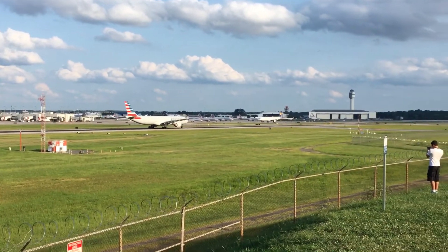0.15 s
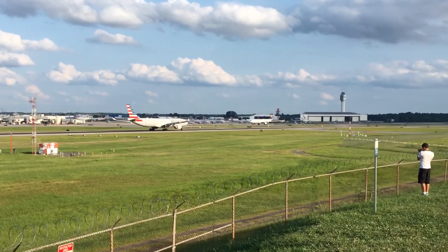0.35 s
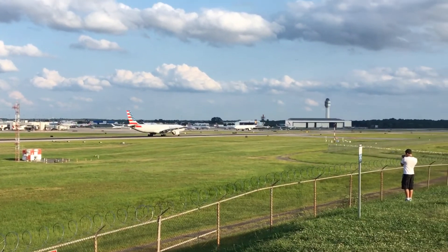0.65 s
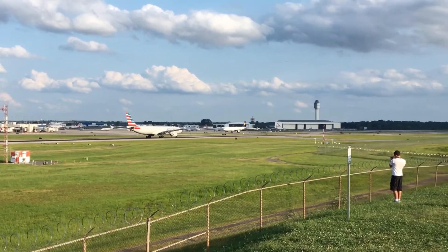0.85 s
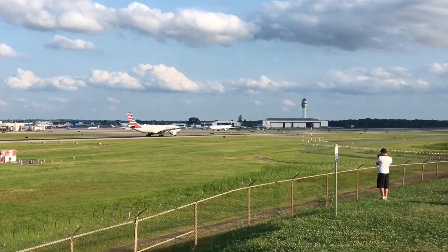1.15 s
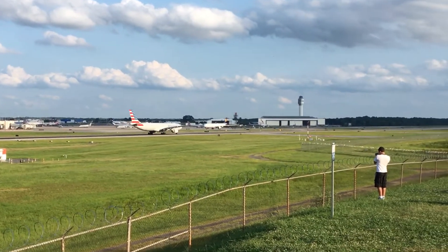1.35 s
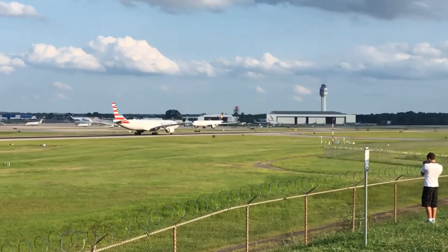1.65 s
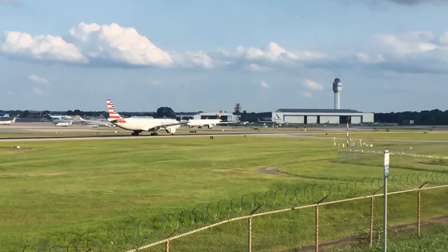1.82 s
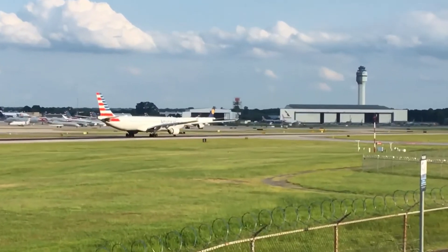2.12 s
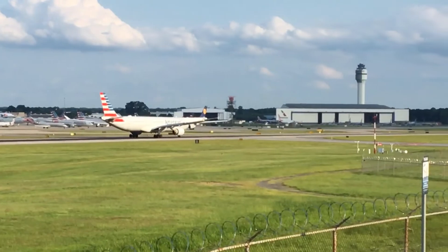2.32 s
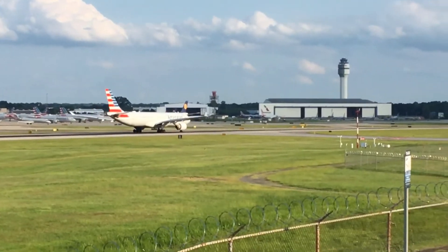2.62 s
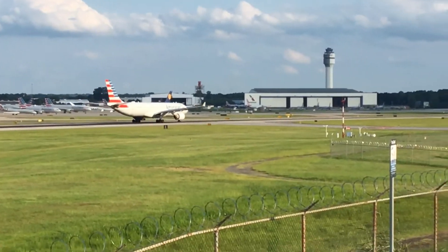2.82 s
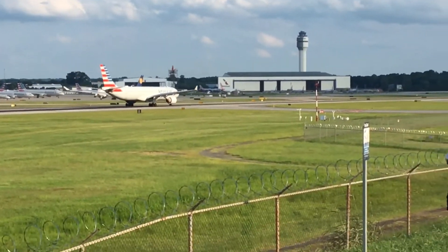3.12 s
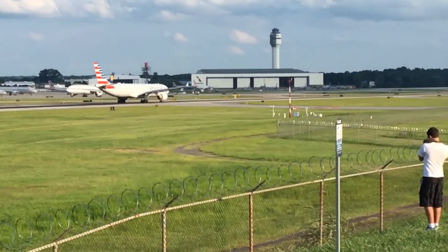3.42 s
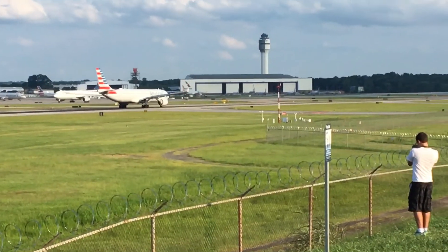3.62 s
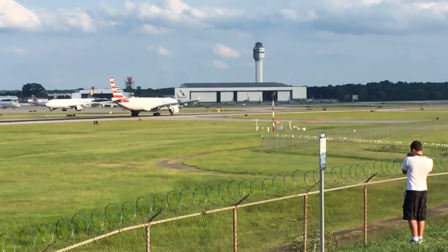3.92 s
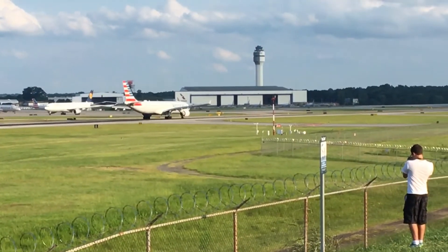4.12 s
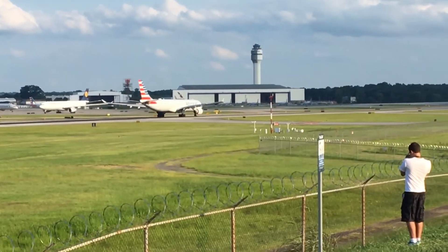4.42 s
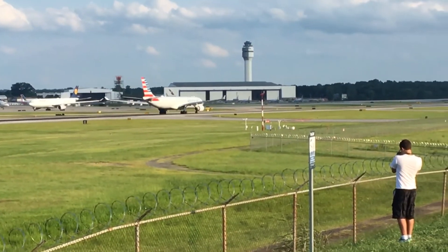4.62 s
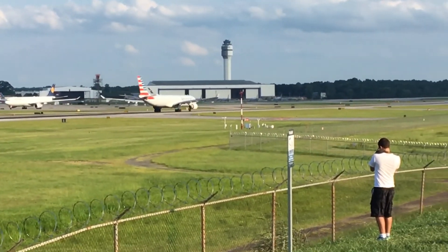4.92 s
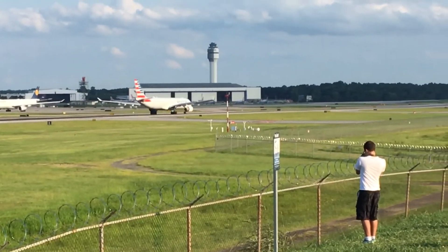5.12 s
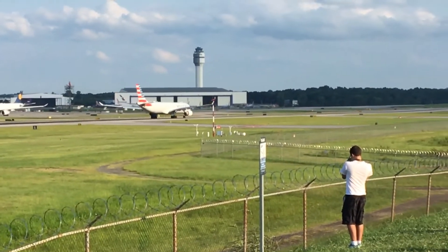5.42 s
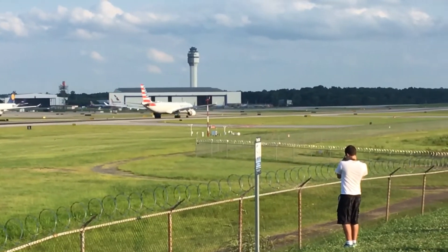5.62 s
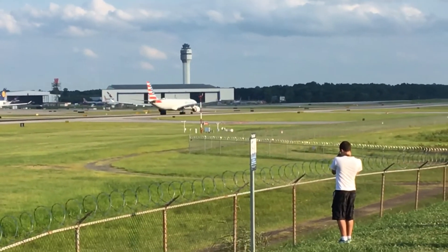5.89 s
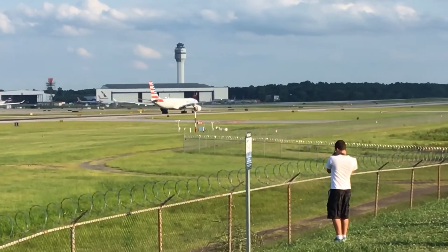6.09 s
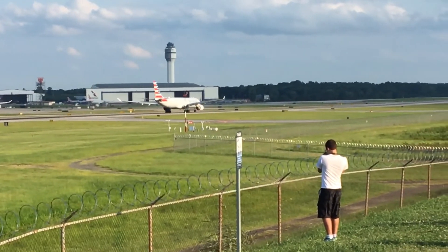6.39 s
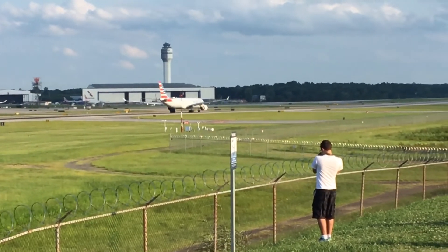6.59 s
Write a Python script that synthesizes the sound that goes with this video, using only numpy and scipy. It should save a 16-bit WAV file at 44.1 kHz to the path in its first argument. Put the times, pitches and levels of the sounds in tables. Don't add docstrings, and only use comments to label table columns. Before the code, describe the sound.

One outdoor microphone low in grass picks up a distant departing jet: heavy, lumpy bass rumble dominates, under a softer mid-range roar that swells and fades. Tiny, very high insect ticks give way to a fast thin buzz after two seconds. Low wind wash runs throughout, with soft thumping puffs from about three seconds and stronger ones near the end. There is only a trace of hiss.

```python
import sys
import numpy as np
from scipy import signal
from scipy.io import wavfile
from scipy.ndimage import uniform_filter1d, minimum_filter1d

SR = 44100
rng = np.random.default_rng(int(sys.argv[2]) if len(sys.argv) > 2 else 0)


def pcm_store(signal):
    levels = np.round(np.clip(np.atleast_2d(signal), -1, 1) * 32767)
    wavfile.write(sys.argv[1], SR, levels.astype(np.int16).T)


def nominal_scale(level):
    x = np.asarray(level, float) / 20
    return 10 ** x


N = 297675


def evened(x):
    return x / np.sqrt(np.mean(x ** 2) + 1e-20)


def read(points, hz):
    f, value = np.transpose(points)
    return np.interp(np.log(hz + 1), np.log(f + 1), value, -120, -120)


def columns(rows, t):
    s, *values = np.transpose(rows)
    return [np.interp(t, s, v) for v in values]


def humps(rows, t):
    return sum(db * np.exp(-2 * (2 * (t - s) / length) ** 2) for s, db, length in rows)


def bell(hz, centre_hz, width_hz):
    return np.exp(-2 * ((hz - centre_hz) / width_hz) ** 2)


def frame_grid(size):
    t = np.arange(4 * N // size + 5)[:, None] * size / 4 / SR
    return t, np.fft.rfftfreq(size, 1 / SR)[None]


def noise(field_db, size):
    z = rng.standard_normal(field_db.shape) + 1j * rng.standard_normal(field_db.shape)
    x = signal.istft((z * nominal_scale(field_db)).T, nperseg=size, noverlap=3 * size // 4)[1]
    return evened(x[:N])


def patches(shape, frames, bins):
    along_time = uniform_filter1d(rng.standard_normal(shape), frames, 0)
    return evened(uniform_filter1d(along_time, bins, 1))


def steadied(x, share, size):
    power = uniform_filter1d(uniform_filter1d(x ** 2, size), size)
    return evened(x / (power + 0.023) ** (np.clip(share, 0, 1) / 2))


def rumble():
    # f/Hz, level/dB per Hz
    colour = [(14, -65.5), (22, -34), (30, -10), (38, -16.5), (48, -1), (68, -1.5), (78, -1.5), (90, -7),
              (105, -7.5), (120, -18), (135, -23.5), (150, -34.5), (200, -67)]
    # t/s, stretch of the hump's upper flank [ratio]
    receding = [(0, 1), (1.5, 0.91), (3.3, 0.84), (5.0, 0.87), (6.75, 0.38)]
    # t/s, level/dB over steady, length/s
    eddies = [(0.429, -3.6, 0.14), (0.708, -5, 0.07), (1.512, 2, 0.14), (1.686, -8.5, 0.11),
              (1.771, 1.5, 0.055), (1.886, -3.5, 0.083), (1.99, -4.3, 0.07), (2.1, 1.5, 0.12),
              (2.2, -5.5, 0.097), (2.355, 2, 0.2), (2.484, -6, 0.05), (2.614, -3.5, 0.19),
              (2.883, -5.5, 0.11), (2.953, 10, 0.04), (3.123, -15, 0.04), (3.542, -4, 0.058),
              (4.225, -11, 0.076), (4.515, -2.5, 0.05), (4.779, -6, 0.062), (4.879, -9, 0.05),
              (5.173, 6.1, 0.091), (5.278, -6.5, 0.12), (5.418, 7.5, 0.017), (5.672, -5.2, 0.044),
              (5.887, 8, 0.032), (5.981, 6.5, 0.033), (6.146, -6.5, 0.11), (6.321, 7, 0.038),
              (6.54, 5, 0.071), (6.63, -10, 0.12)]
    level_db, flank_from_hz = -12, 80
    t, hz = frame_grid(size=4096)
    flank = np.maximum(hz - flank_from_hz, 0)
    stretched_hz = hz - flank + flank / columns(receding, t)[0]
    x = noise(read(colour, stretched_hz), size=4096)
    crest = np.argmax(x[:SR // 2])
    x = np.pad(x[crest:], (0, crest), "reflect")
    swell_db = 1.12 * humps(eddies, np.arange(N) / SR)
    return nominal_scale(level_db + swell_db) * steadied(x, 0.6, size=2000)


def roar():
    # f/Hz, level/dB per Hz
    jet_colour = [(380, -32), (640, 1.5), (780, -1.26), (1110, -13.5), (1750, -13), (2400, -15.5),
                  (2700, -22.5), (3700, -27), (4300, -29), (5500, -31.0), (6700, -35.5), (7700, -44.5),
                  (9000, -55), (10300, -67), (11500, -91.5)]
    # f/Hz, width/Hz, level/dB
    ground = [(666, 540, 1.0), (1744, 250, 3), (2620, 130, -5), (2970, 130, -4.5), (3386, 390, 4),
              (4610, 210, -4)]
    bands_hz = [750, 1800, 3500, 6300]
    # t/s, level/dB
    air_rows = [(0.0, -28), (0.21, -29.5), (0.9, -23.5), (1.49, -28), (2.27, -26), (2.29, -25), (2.44, -29),
                (2.95, -26.5), (3.01, -28), (3.35, -22.5), (3.99, -29), (4.04, -33.5), (4.74, -29.5),
                (4.91, -24.5), (5.83, -24.5), (6.07, -31), (6.13, -28), (6.75, -26)]
    # t/s, level/dB, length/s
    clearings = [(.33, 6, 0.38), (.75, 3.5, .15), (.92, 2, 0.23), (1.15, 1, 0.51), (1.63, 4.5, 0.32),
                 (2.27, 2.5, 0.55), (2.85, -2.5, 0.32), (3.4, -4, 0.76), (3.76, 1, .2), (4.38, 3.5, .4),
                 (4.8, 1.5, 0.23), (5.2, 2, .4), (5.39, 7.5, 0.23), (5.9, -2.5, 0.39), (6.27, 5, 0.52),
                 (6.7, -0.5, .3)]
    # t/s, level/dB, length/s
    haze_rows = [
        (3.9, -3.5, 1.6),
    ]
    # share of air swell, share of clearing, share of haze [ratios], loss/dB per s
    follows = [
        (0.78, .05, 0.26, 0.26),
        (0.83, .95, .2, -0.08),
        (0.59, 0.54, 0.89, 0.06),
        (0.59, 0.45, .8, 1.93),
    ]
    # t/s, f/Hz, level/dB
    late_dip = [
        (4.6, 5070, -3.5),
        (5.2, 5150, -8),
        (6.0, 5040, -4.5),
        (6.75, 5020, -4),
    ]

    t, hz = frame_grid(size=1024)
    field = read(jet_colour, hz) + sum(db * bell(hz, f, width) for f, width, db in ground)
    shares = [np.interp(hz, bands_hz, row) for row in np.eye(4)]
    air = columns(air_rows, t)[0]
    clear, haze = humps(clearings, t), humps(haze_rows, t)
    for share, (swell, bright, dull, loss_db) in zip(shares, follows):
        band_db = swell * air + bright * clear + dull * haze - loss_db * t
        field = field + share * (band_db - band_db.mean())
    dip_hz, dip_db = columns(late_dip, t)
    field += dip_db * bell(hz, dip_hz, 260)
    field += 0.72 * patches(field.shape, frames=8, bins=14)
    flicker = patches(t.shape, frames=3, bins=1)
    field += 0.5 * (1 - shares[0]) * flicker
    return nominal_scale(-25.5) * noise(field, size=1024)


def stroke(u):
    u = np.clip(u, 0, 1)
    return 2.4 * u ** 1.3 * (1 - u ** 5)


def cricket():
    # f/Hz, level/dB per Hz
    wing = [(9500, -35), (10600, -17), (11300, -7), (12200, -8), (13200, -4), (14000, -1), (14600, -3),
            (15200, 1), (15800, -3)]
    # t/s, peak level/dB
    tick_rows = [(0.0164, -59), (0.0802, -60), (0.1565, -59), (0.2224, -63), (0.3007, -61), (0.3721, -57),
                 (0.4459, -58), (0.5177, -56), (0.5856, -58), (0.6554, -62), (0.7447, -58), (0.8145, -59),
                 (0.9597, -61), (1.0326, -59), (1.5813, -59), (1.6521, -61), (1.8208, -64), (2.0014, -61),
                 (2.0707, -63)]
    # t/s, effort level/dB, lead over a steady beat [strokes]
    buzz_rows = [(2.2, -83, -.22), (2.6, -70, .47), (3.1, -69, .95), (4.1, -67, 1.13), (4.4, -63.5, 1.02),
                 (4.7, -65.5, .86), (5.12, -62, .38), (5.3, -68.5, .38), (6.2, -70, -.43),
                 (6.35, -66.5, -.59), (6.75, -62.5, -.46)]
    buzz_from_s, duller_from_s, beat_per_s = buzz_rows[0][0], 5.2, 56

    t, hz = frame_grid(size=512)
    tilt = np.where(t < buzz_from_s, 1.5, np.where(t < duller_from_s, 0.3, -1.8))
    field = read(wing, hz) + tilt * (hz - 13500) / 2000
    field = field + 2.2 * patches((len(t), hz.size), frames=40, bins=4)
    ring = noise(field, size=512)

    t = np.arange(N) / SR
    effort_db, ahead = columns(buzz_rows, t)
    smear = np.where(t < duller_from_s, 0.13, 0.36)
    phase = (beat_per_s * t + ahead + 0.44) % 1
    strokes = stroke(phase / 0.7)
    pulse = (1 - smear) * strokes + smear + 0.073
    buzz = nominal_scale(effort_db + 2.8) * (t > buzz_from_s) * pulse
    ticks = sum(nominal_scale(db - 10.3) * stroke(1 - (t - s + 0.001) / 0.017) for s, db in tick_rows)
    return ring * (buzz + ticks)


def wind():
    # t/s, level/dB
    wash_rows = [(0.0, -38), (1.35, -32.5), (3.23, -35), (3.46, -30.5), (3.85, -42.5), (4.12, -36.5),
                 (4.28, -35), (4.68, -38), (4.98, -31.5), (5.68, -30), (5.92, -35), (6.75, -30)]
    # f/Hz, level/dB per Hz
    wash_colour = [(76, -24.5), (130, -6), (151, -3), (318, -6.5), (382, -7.5), (447, -27), (520, -7),
                   (680, -42), (1140, -120)]
    # t/s, peak level/dB, length/s, centre f/Hz
    puffs = [(1.232, -31, 0.028, 213), (1.6, -24, 0.03, 164), (2.926, -13.5, 0.03, 256),
             (3.493, -23, 0.041, 269), (3.636, -14.5, 0.027, 286), (3.702, -25.5, 0.059, 277),
             (3.819, -29, 0.054, 196), (3.868, -15.5, 0.023, 360), (3.954, -23, 0.033, 159),
             (4.052, -35, 0.044, 325), (4.127, -15, 0.035, 205), (4.237, -15.5, 0.05, 177),
             (4.352, -17.5, 0.026, 330), (4.478, -19, 0.023, 332), (4.533, -19, 0.033, 330),
             (4.685, -19, 0.023, 360), (5.22, -18.5, 0.025, 202), (5.503, -24, 0.047, 305),
             (5.731, -7, 0.041, 252), (5.751, -14, 0.034, 223), (5.996, -20, 0.02, 224),
             (6.069, -11.5, 0.03, 166), (6.128, -9.5, 0.026, 330), (6.407, -10.5, 0.036, 221),
             (6.448, -21, 0.059, 160), (6.647, -41, 0.03, 229), (6.705, -15, 0.035, 213)]
    t, hz = frame_grid(size=1024)
    field = read(wash_colour, hz) + 2.0 * patches(t.shape, frames=4, bins=1)
    field = field + 1.2 * patches((len(t), hz.size), frames=6, bins=3)
    wash_db = columns(wash_rows, np.arange(N) / SR)[0] + 2.5
    out = nominal_scale(wash_db) * noise(field, size=1024)
    draws = rng.standard_normal((len(puffs), 4410))
    for (s, db, length, centre_hz), draw in zip(puffs, draws):
        sos = signal.butter(3, [110, centre_hz + 260], "band", fs=SR, output="sos")
        burst = signal.sosfilt(sos, draw)
        burst = signal.lfilter([1], [1, -0.975], burst)
        u = np.arange(len(draw)) / SR / length
        swell = np.sin(np.pi * np.clip(u, 0, 1)) ** 2
        puff = nominal_scale(db - 7) * evened(burst) * swell
        part = out[round((s - 0.006) * SR):][:len(draw)]
        part += puff[:len(part)]
    return out


def field_floor():
    # f/Hz, level/dB per Hz
    hiss = [(8000, -20), (10300, -9), (11500, -5), (13000, -12), (14500, -11), (15700, -14)]
    t, hz = frame_grid(size=512)
    return nominal_scale(-80) * noise(read(hiss, hz) + 0 * t, size=512)


def scene():
    mix = rumble() + roar() + cricket() + wind() + field_floor()
    return mix[None]


def band_limit(x):
    return signal.sosfilt(signal.butter(12, 15810, fs=SR, output="sos"), x)


def record(dry):
    dry = signal.sosfilt(signal.butter(4, 38, "high", fs=SR, output="sos"), dry)
    crest = -minimum_filter1d(-abs(dry), size=601)
    excess = np.maximum(crest / 0.97, 1)
    eased = dry / uniform_filter1d(uniform_filter1d(excess, size=301), size=301)
    eased = eased * np.minimum(np.arange(N)[::-1] / 200, 1)
    return band_limit(eased)


dry = scene()
out = record(dry)
pcm_store(out)
```